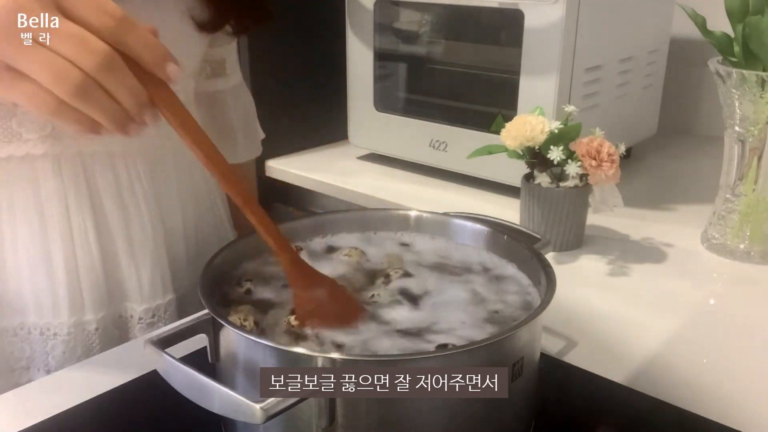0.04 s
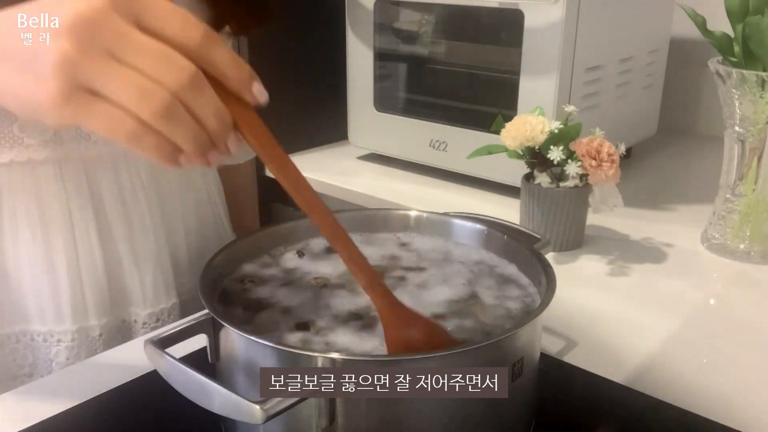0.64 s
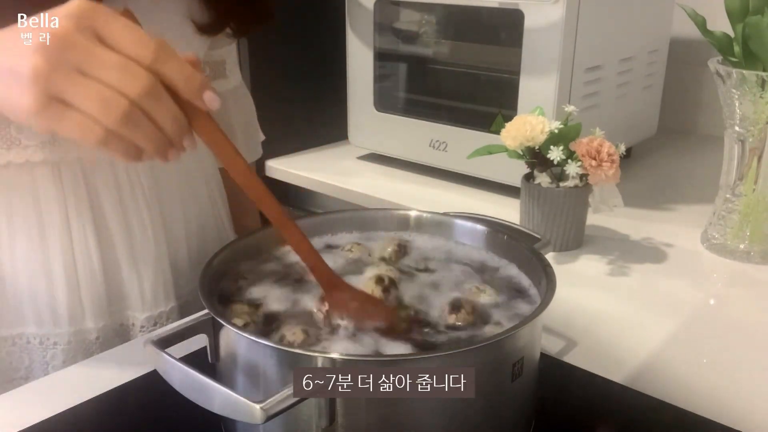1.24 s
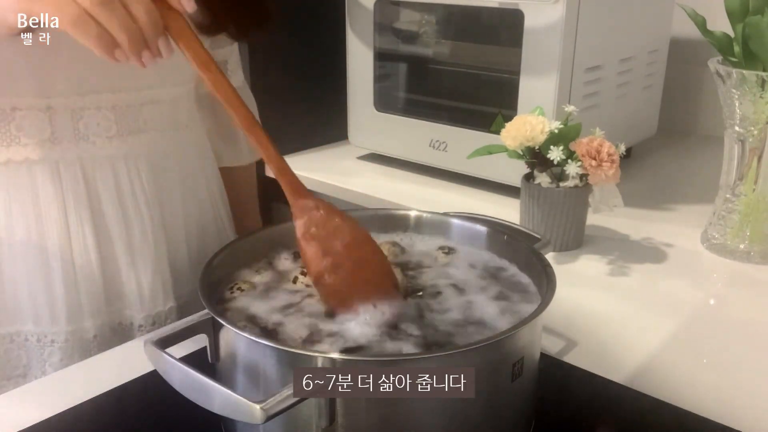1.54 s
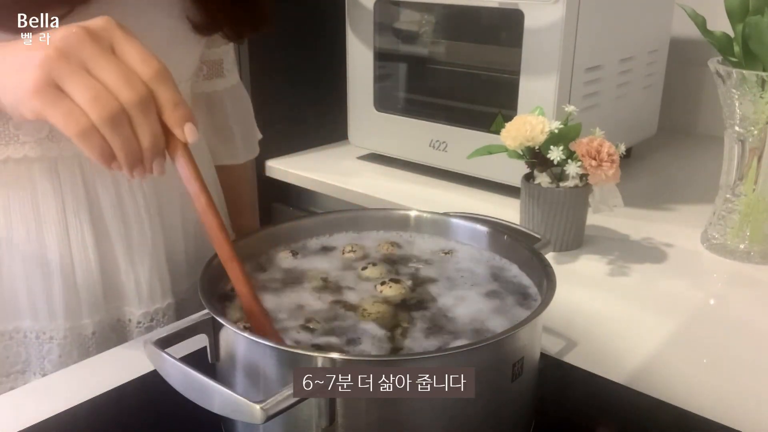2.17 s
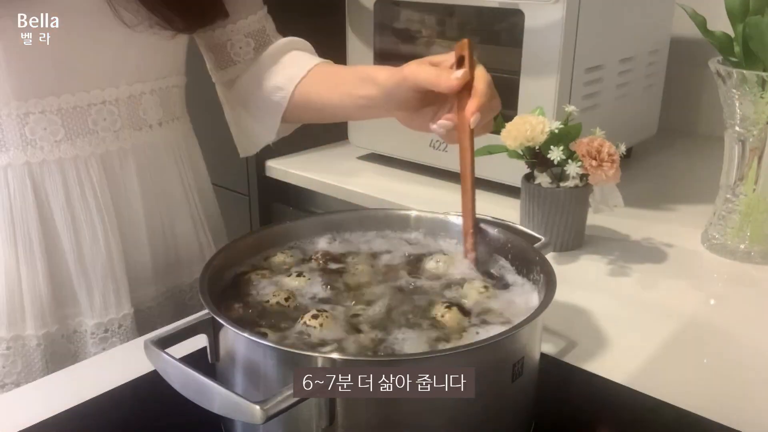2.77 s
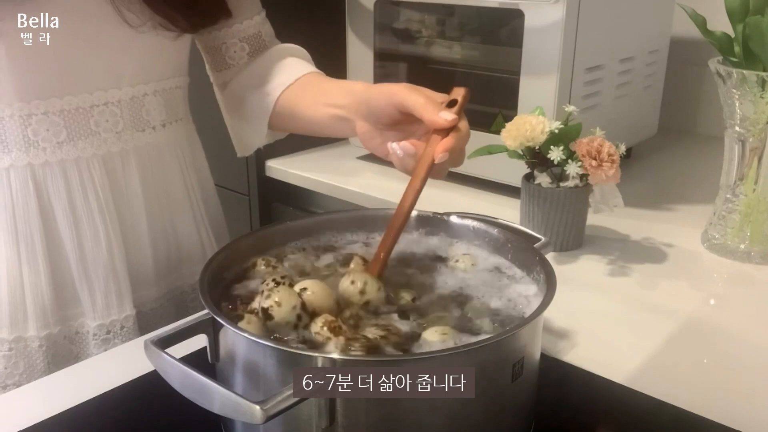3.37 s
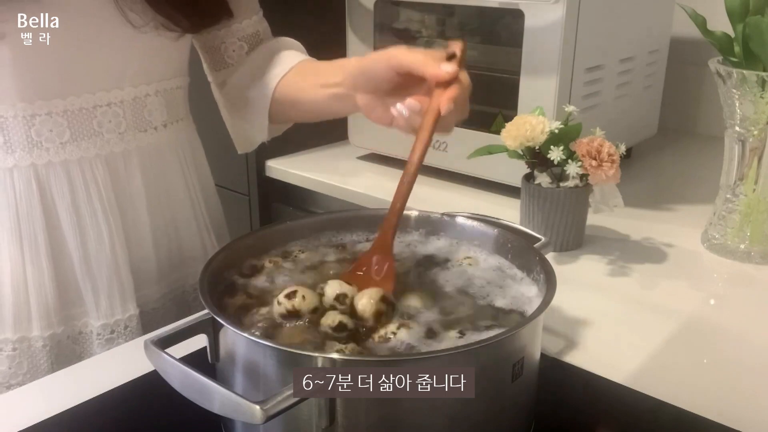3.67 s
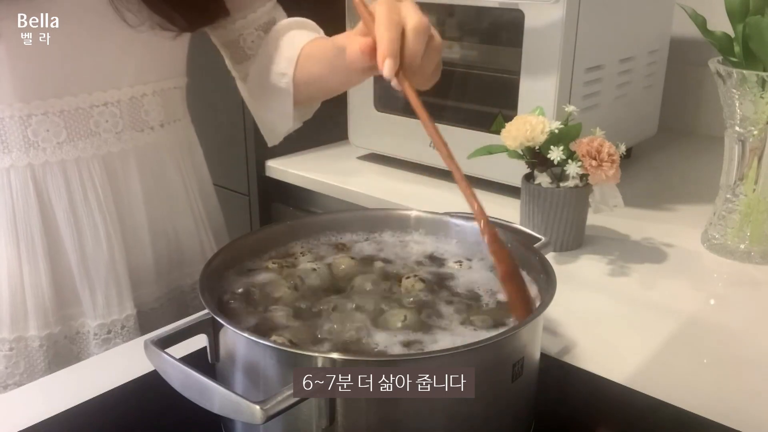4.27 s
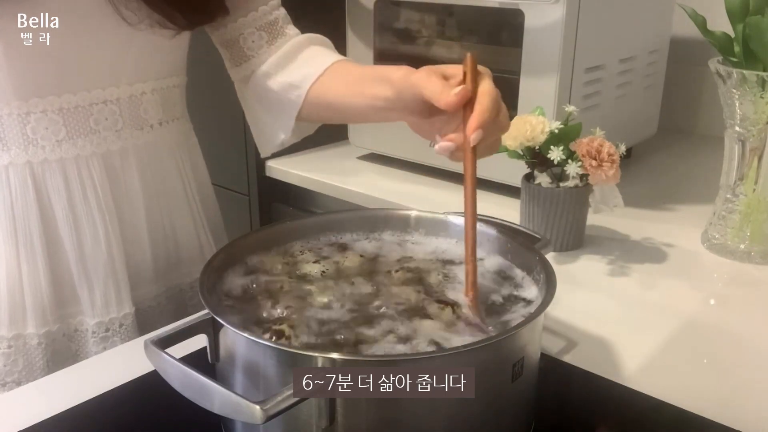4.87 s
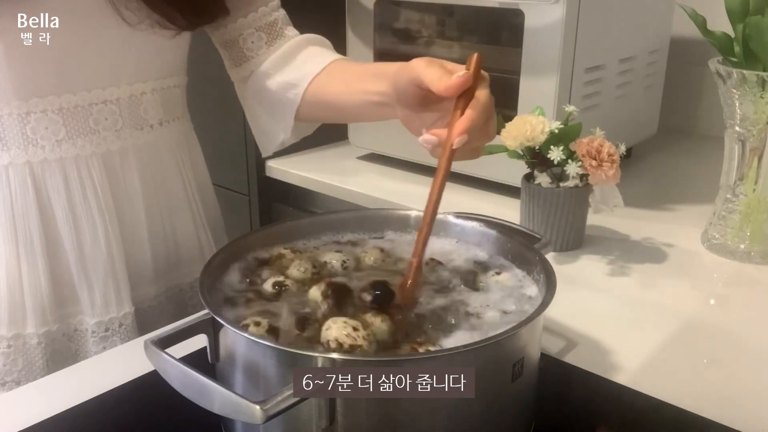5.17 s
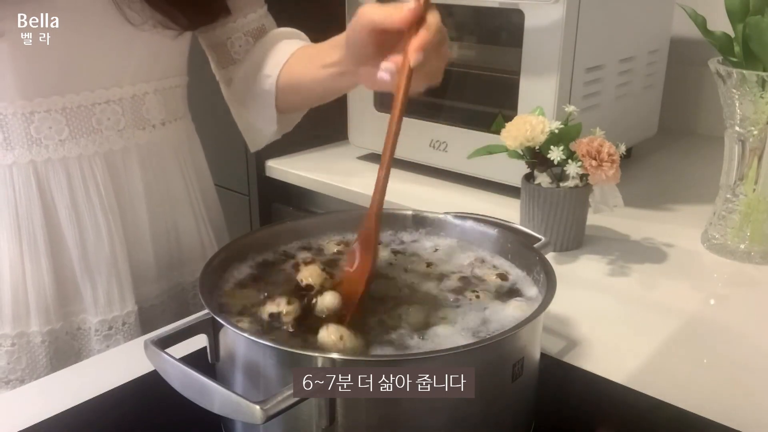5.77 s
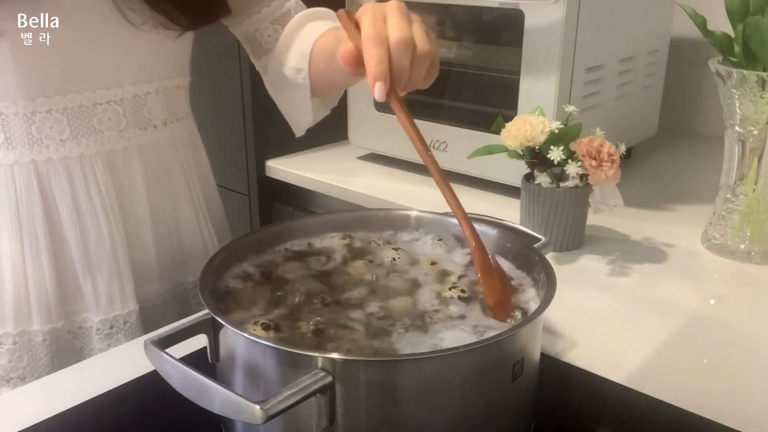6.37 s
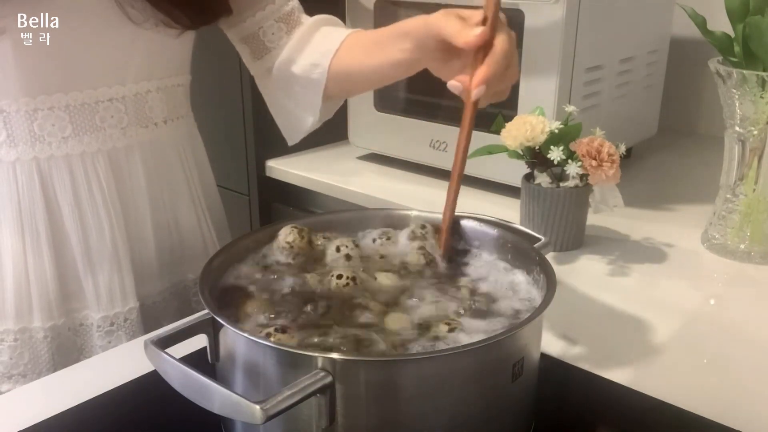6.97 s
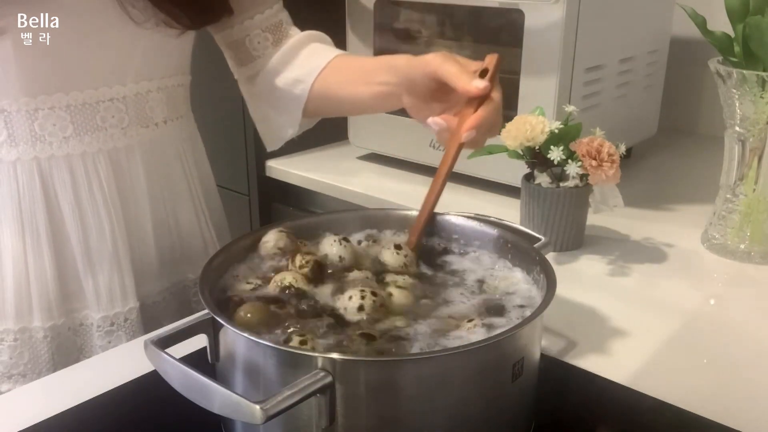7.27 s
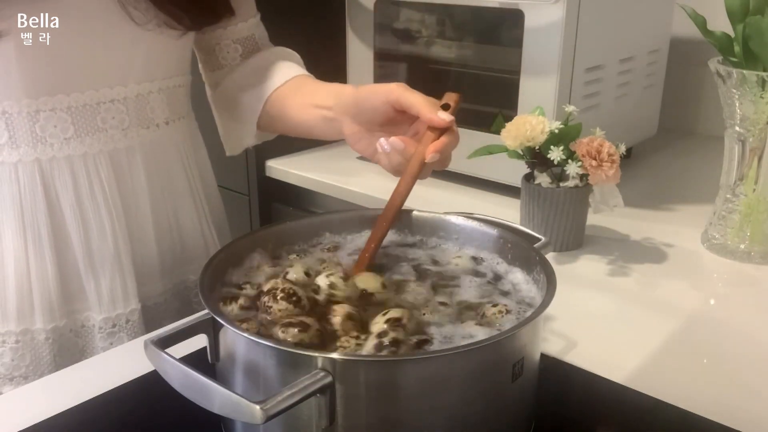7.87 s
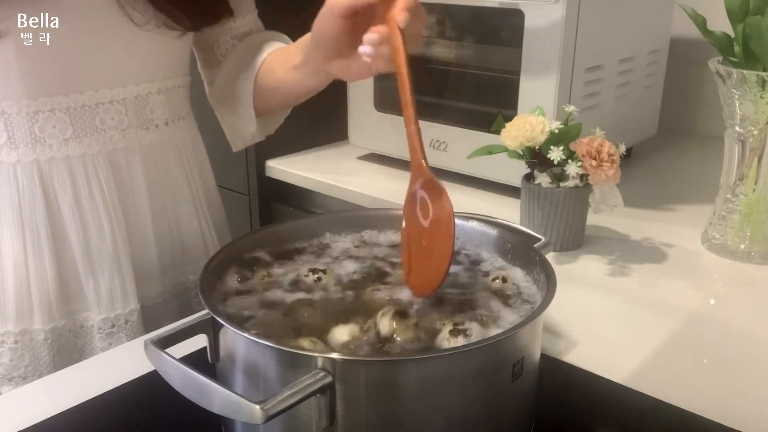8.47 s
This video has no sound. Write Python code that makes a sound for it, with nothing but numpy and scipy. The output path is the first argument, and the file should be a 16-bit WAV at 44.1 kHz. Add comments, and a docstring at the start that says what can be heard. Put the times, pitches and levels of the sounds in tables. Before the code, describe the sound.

Boiling water rumbles and gurgles in a steel pot while stirred quail eggs tick together and a wooden spoon knocks the sides.

```python
"""A small kitchen, one microphone close to an open steel pot of quail eggs boiling on the cooktop.
From the start vapour bubbles rumble the pot, and a wooden spoon stirs up gurgle, splash and fizz.
The spoon knocks on the steel, large bubbles plop, and the eggs clack and tick against each other.
At 2.75 s there is an edit click; after the cut the boil is louder and the stirring goes on.
From 3.5 s tiny bubbles spit now and then as eggs are lifted through the surface."""
import sys
import numpy as np
from scipy import signal
from scipy.fft import rfft, irfft
from scipy.io import wavfile
from scipy.ndimage import uniform_filter1d

SR = 44100
rng = np.random.default_rng(int(sys.argv[2]) if len(sys.argv) > 2 else 0)


def materialize(psi):
    """Save the field psi as 16-bit PCM at rate SR to the path in sys.argv[1].

    A 1-D psi becomes a single channel; in a 2-D psi each row is a channel.
    """
    bounded = np.clip(np.atleast_2d(psi).T, -1, 1)
    quanta = np.round(bounded * 32767).astype(np.int16)
    wavfile.write(sys.argv[1], SR, quanta)


N = 376613
CUT_S = 2.7533   # an edit: gentle boil before it, rolling boil after


def from_db(db):
    """Decibels to gain."""
    return 10 ** (np.asarray(db) / 20)


def rms_one(x):
    """Scale to rms 1."""
    return x / np.sqrt(np.mean(x ** 2) + 1e-20)


def even(x, size=4000):
    """Hold the level near rms 1 over a window of `size` samples, keeping the grain."""
    x = rms_one(x)
    return x / np.sqrt(uniform_filter1d(x ** 2, size=size) + 1e-6)


def add(out, s, sound):
    """Mix a short sound in at time s."""
    at = int(np.clip(round(s * SR), 0, N - 1))
    out[at:at + len(sound)] += sound[:N - at]


def through(x, response):
    """Pass a sound through an impulse response."""
    return signal.oaconvolve(x, response)[:len(x)]


def butter(x, order, hz, kind):
    """Butterworth filter."""
    return signal.sosfilt(signal.butter(order, hz, kind, fs=SR, output="sos"), x)


def snap(spectrum, size=2048):
    """The most compact causal click (minimum phase) with these (frequency [Hz], level [dB]) points."""
    hz, db = np.transpose(spectrum)
    grid = np.maximum(np.fft.rfftfreq(size, 1 / SR), 1)
    magnitude = from_db(np.interp(np.log(grid), np.log(hz), db))
    cepstrum = irfft(np.log(magnitude))
    causal = 1 + np.sign(size / 2 - np.arange(size))
    causal[0] = 1
    return irfft(np.exp(rfft(cepstrum * causal)))


def resonate(x, hz, width):
    """One resonance with gain 1 at its peak."""
    r = np.exp(-np.pi * width / SR)
    feedback = [1, -2 * r * np.cos(2 * np.pi * hz / SR), r * r]
    return signal.lfilter(np.array([1, 0, -1]) * (1 - r * r) / 2, feedback, x + 1e-18)


def body(x, modes, sign=1):
    """Resonances side by side; sign=-1 alternates their polarity."""
    return sum(sign ** k * from_db(db) * resonate(x, hz, width)
               for k, (hz, width, db) in enumerate(modes))


def ring(hz, t60, size=2048):
    """A struck mode: a dying sine."""
    t = np.arange(size) / SR
    return np.sin(2 * np.pi * hz * t) * from_db(-60 * t / t60)


def drift(per_s):
    """A slow random wander with rms 1."""
    knots = rng.standard_normal(N // 40)
    return rms_one(np.interp(np.arange(N) / SR * per_s, np.arange(len(knots)), knots))


def collapses(per_s, spread_db):
    """Clicks at random moments: many small, a few large."""
    sizes = from_db(spread_db * np.minimum(rng.exponential(1, N), 4.5)) * rng.choice([-1, 1], N)
    return sizes * (rng.random(N) < per_s / SR)


def bubble(hz, cycles, rise, size=2048):
    """A bubble rings for some cycles and climbs in pitch as it nears the surface."""
    turns = hz * np.arange(size) / SR
    age = turns / cycles
    return np.sin(2 * np.pi * turns * (1 + rise * np.minimum(age, 1))) * from_db(-60 * age)


def bubble_cloud(clicks, low_hz, high_hz, cycles, rise, count=28):
    """Each click starts a bubble of a chance size; the spectrum is even across the range."""
    dealt = rng.integers(0, count, N)
    return sum(hz * through(clicks * (dealt == k), bubble(hz, cycles, rise))
               for k, hz in enumerate(np.geomspace(low_hz, high_hz, count)))


def chatter(t60, loose_db, size=2048):
    """One contact, then a quickly dying rattle of the touching surfaces; energy 1."""
    rattle = rng.standard_normal(size) * from_db(-60 * np.arange(size) / SR / t60)
    contact = signal.unit_impulse(size) + from_db(loose_db) * rattle / np.linalg.norm(rattle)
    return contact / np.linalg.norm(contact)


def knock_colour(pitch_hz, softness, bass_db_per_octave=1.5, top_hz=8050, top_db_per_octave=17.5):
    """A knock is strongest at its pitch; the softer the touch, the faster it falls off above."""
    hz = np.geomspace(60, 16000, 60)
    octaves = np.log2(hz / pitch_hz)
    db = bass_db_per_octave * np.minimum(octaves, 0) - softness * np.maximum(octaves, 0)
    top_loss_db = top_db_per_octave * np.maximum(np.log2(hz / top_hz), 0)
    return np.column_stack([hz, db - top_loss_db])


def boil(stirred, gentle_db, rolling_db):
    """Gain of a layer: a gentle boil before the cut, a rolling one after; stirring adds its power."""
    boil_db = np.where(np.arange(N) / SR < CUT_S, gentle_db, rolling_db)
    return np.hypot(from_db(boil_db), stirred)


# spoon strokes through the water: (start [s], end [s], gurgle [dB], splash [dB], fizz [dB], rumble [dB])
STROKES = [(-0.05, 0.18, -61.5, -71.5, -75, -41.5), (0.721, 1.142, -58, -69, -83, -40),
           (1.19, 1.398, -59, -65, -81, -39), (1.451, 1.75, -69, -81, -94, -59),
           (1.806, 2.102, -57.5, -74, -83, -35.5), (2.327, 2.56, -57.5, -66.5, -77.5, -44.5),
           (2.751, 3.333, -58, -69, -82, -33.5), (3.4, 3.82, -59, -71, -80, -37.5),
           (4.719, 4.907, -62.5, -94, -97, -30.5), (4.945, 5.18, -57, -66, -71, -29.5),
           (5.203, 5.32, -55, -66, -70, -32), (5.354, 5.503, -60, -70, -86, -42),
           (5.558, 5.911, -63, -73.5, -75, -55), (6.38, 6.751, -62, -72, -74.5, -29.5),
           (6.932, 7.398, -64, -71.5, -74.5, -36), (7.399, 7.8, -68, -72.5, -81, -53),
           (7.871, 8.22, -62, -72, -78, -35.5)]
def stirring(attack_s=0.069, settle_db_per_s=61):
    """Gains of gurgle, splash, fizz and rumble: the water picks up with each stroke, then settles."""
    t, power = np.arange(N) / SR, 0
    for start, end, *levels_db in STROKES:
        attack = np.clip((t - start) / attack_s, 0, 1)
        settle = from_db(-settle_db_per_s * np.maximum(t - end, 0))
        power = power + np.outer(from_db(levels_db), attack * settle) ** 2
    return np.sqrt(power)


# low swaying of the full pot on the cooktop: (frequency [Hz], width [Hz], level [dB])
DEEP_SWAY = [(42.3, 3.6, 2.5), (62, 6.7, -0.5), (80.6, 8.5, -2.5)]
UPPER_SWAY = [(109.2, 7.1, 3.5), (137.8, 19.4, -6.5), (160.6, 19.3, -9.5)]
def rumble(stirred, heave_db=2.0):
    """The pot shakes with the boil, heaving unevenly, and more when the spoon moves the water."""
    deep = boil(stirred * from_db(-2.5), gentle_db=-46, rolling_db=-35.5)
    deep *= from_db(heave_db * drift(per_s=14))
    upper = boil(stirred * from_db(-9.5), gentle_db=-51.5, rolling_db=-43.5)
    upper *= from_db(heave_db * drift(per_s=11))
    return deep * shake(DEEP_SWAY, band_hz=[34.8, 93.8]) + upper * shake(UPPER_SWAY, band_hz=[92, 164])


def shake(modes, band_hz, per_s=260):
    """Vapour pockets collapse on the bottom and keep these modes of the pot moving."""
    motion = body(collapses(per_s, spread_db=1.5), modes, sign=-1)
    return even(butter(motion, 4, band_hz, "band"))


# modes of the steel walls: (frequency [Hz], width [Hz], level [dB])
WALL_MODES = [(207.2, 14.2, 4.5), (250.7, 12.6, -4), (315.3, 18.5, -1.5), (394.3, 22.6, 2),
              (480.7, 15, -5.5), (552, 60, -10.5), (1070, 125, -14.5), (1095, 62, -16.5), (1200, 120, -20)]
def simmer(stirred):
    """Countless small vapour bubbles collapse on the hot steel and keep the walls humming."""
    hum = shake(WALL_MODES, band_hz=[180, 1400], per_s=3000)
    swirl = stirred * boil(0, gentle_db=0.5, rolling_db=3.5)
    return boil(swirl, gentle_db=-83, rolling_db=-57) * hum


# colours of the bubbling water, close up: (frequency [Hz], level [dB])
GURGLE_COLOUR = [(120, -4), (200, 4), (300, -1), (400, -3.5), (470, -4.5), (650, -1.5), (900, 0),
                 (1200, -6.5), (1450, -6.5), (2200, -22)]
SPLASH_COLOUR = [(600, -8), (1300, -8.5), (2000, 1), (3200, -2.5), (3900, -9), (6000, -4.5)]
FIZZ_COLOUR = [(2000, 2), (3800, -0.5), (5600, -4), (7800, -1.5), (9500, -10), (12000, -11), (16000, -25)]
def water(gurgling, splashing, fizzing):
    """Middling bubbles gurgle, small ones splash in clumps, foam cells pop and tiny bubbles ping."""
    clumps = drift(per_s=55)
    middling = bubble_cloud(collapses(420 * from_db(6 * clumps), 3.5), 241, 1624, cycles=6.9, rise=0.074)
    small = bubble_cloud(collapses(380 * from_db(6 * clumps), 3.4), 1060, 4300, cycles=3.6, rise=0.05)
    foam = bubble_cloud(collapses(900 * from_db(6.5 * clumps), 1.5), 3100, 12000, cycles=3.8, rise=0.03)
    tiny = bubble_cloud(collapses(170, spread_db=2.2), 5200, 7600, cycles=45, rise=0.01)
    gurgle_gain = boil(gurgling * from_db(1.5), gentle_db=-69.5, rolling_db=-62)
    splash_gain = boil(splashing * from_db(-1.5), gentle_db=-92, rolling_db=-75.5)
    foam_gain = boil(fizzing * from_db(-6), gentle_db=-98, rolling_db=-74.5)
    gurgle = gurgle_gain * even(through(middling, snap(GURGLE_COLOUR)), size=6000)
    splash = splash_gain * even(through(small, snap(SPLASH_COLOUR)), size=6000)
    fizz = foam_gain * even(through(foam, snap(FIZZ_COLOUR)), size=6000)
    pings = foam_gain * from_db(-7) * rms_one(tiny)
    return gurgle + splash + fizz + pings


def glugs(gurgling):
    """Bubbles of nearly one size keep breaking the surface, only faintly before the cut."""
    cloud = bubble_cloud(collapses(per_s=60, spread_db=1.5), 1077, 1253, cycles=30, rise=0.045, count=10)
    swirl = gurgling * boil(0, gentle_db=-14, rolling_db=-7)
    return boil(swirl, gentle_db=-95, rolling_db=-74.5) * even(cloud, size=12000)


# colour of grazing shells and tearing foam: (frequency [Hz], level [dB])
CRACKLE_COLOUR = [(500, -14), (1500, 3), (3000, 2), (5500, -0.5), (8000, -2.5), (11000, -11), (16000, -28)]
def crackle(fizzing, gain_db=-2.5):
    """Shells graze and foam tears in the spoon's wake: fine, dry, unpitched ticks in clumps."""
    grains = collapses(170 * from_db(5 * drift(per_s=45)), spread_db=4)
    return from_db(gain_db) * fizzing * even(through(grains, snap(CRACKLE_COLOUR)), size=9000)


# colour of the background at the microphone: (frequency [Hz], level [dB])
HISS_COLOUR = [(100, 11), (400, -5.5), (1100, -13), (2000, -17.5), (3100, -14), (3900, -20.5),
               (5500, -19.5), (7800, -21), (10000, -26), (15500, -31)]
def hiss(level_db=-62):
    """A faint, steady noise lies behind the pot."""
    return from_db(level_db) * rms_one(through(rng.standard_normal(N), snap(HISS_COLOUR)))


# how an egg rings: (frequency [multiple of its pitch], level [dB], t60 [s])
EGG_MODES = [(0.57, -0.5, 0.007), (1.0, -1.5, 0.0093), (1.52, -10, 0.005)]
def clack(hz, crack_db=18, softness=12):
    """Two eggs meet with a dry crack and ring for a few cycles."""
    crack = through(chatter(t60=0.012, loose_db=4), snap(knock_colour(hz, softness)))
    ringing = sum(from_db(db) * ring(hz * ratio, t60) for ratio, db, t60 in EGG_MODES)
    return from_db(crack_db) * crack + ringing


def jostle(splashing, per_s=18, gain_db=13.25, spread_db=4.5, low_hz=1200, high_hz=2490):
    """Eggs bump softly against each other at random, as hard as the spoon drives them."""
    out = np.zeros(N)
    for when, pitch, force in rng.random((int(per_s * N / SR), 3)):
        bump = clack(low_hz * (high_hz / low_hz) ** pitch)
        gain = splashing[int(when * N)] * from_db(gain_db + spread_db * (2 * force - 1))
        add(out, when * N / SR, gain * bump)
    return out


# the wooden spoon's own resonances: (frequency [Hz], width [Hz], level [dB])
SPOON_MODES = [(1000, 117, -6), (2480, 240, -13)]
# spoon and eggs knock on the pot, hard blows touching at several spots:
# (time [s], level [dB], hollow pitch [Hz], softness [dB lost per octave above the pitch])
KNOCKS = [(0.034, -20.5, 1790, 15), (0.0648, -9, 1035, 13), (0.152, -15.5, 1900, 12),
          (0.2338, -15, 1610, 10), (0.5408, -5.5, 1050, 4), (0.5478, -10, 1600, 15), (0.668, -12, 1000, 9),
          (0.6967, -13, 1200, 16), (0.7327, -8, 750, 9.5), (0.8321, -6.5, 1600, 11.5),
          (0.8365, -3, 1050, 25), (1.1438, -12, 1200, 12), (1.8102, -7.5, 1190, 11),
          (1.9035, -12.5, 1400, 12), (1.921, -16, 1024, 8), (2.006, -11, 1000, 8.5), (2.0566, 1, 760, 7.5),
          (2.0567, -8, 4200, 26), (2.0619, 1.5, 520, 11), (2.064, -10, 2600, 29), (2.161, -18, 830, 8),
          (2.3148, -9.5, 900, 13), (2.3425, -8.5, 800, 12), (2.649, -16.5, 1810, 8.5),
          (3.4355, -10.5, 1210, 14), (3.4796, -9.5, 950, 6.5), (3.5645, -10.5, 1090, 12.5),
          (4.168, -14, 3000, 8), (5.2855, -11, 1000, 12), (5.3174, -6, 895, 18), (5.622, -13.5, 1460, 12),
          (5.8183, -10, 850, 17), (6.1012, -10, 1540, 7.5), (6.1747, 0, 2370, 5.5), (6.1832, -11, 5830, 9),
          (6.2722, -7.5, 817, 6), (6.315, -8, 1256, 13.5), (6.5435, 0, 1110, 16), (7.7367, -13, 1000, 17),
          (7.9465, -9, 1400, 14), (8.2521, -6, 746, 14.5), (8.2777, -7, 500, 8.5),
          (8.4505, -2.5, 720, 14.5), (8.4655, -5, 600, 15)]
def knocks(gain_db=-1.88, rebound_s=0.0056, rebound_db=-12, hollow_db=-1, hollow_width_hz=240):
    """Wood and shell on steel: hard touches are bright, soft ones dull and smeared; each rebounds once."""
    out = np.zeros(N)
    for s, db, pitch_hz, softness in KNOCKS:
        click = from_db(db + gain_db) * snap(knock_colour(pitch_hz, softness))
        knock = click + body(click, SPOON_MODES + [(pitch_hz, hollow_width_hz, hollow_db)])
        smear = chatter(t60=0.036, loose_db=-5 + 0.21 * softness)
        add(out, s, through(smear, knock))
        add(out, s + rebound_s * rng.uniform(0.616, 1.5), from_db(rebound_db) * knock)
    return out


# large bubbles burst at the surface: (time [s], level [dB], pitch [Hz])
PLOPS = [(0.127, -46, 410), (0.1915, -41, 1040), (0.835, -28.5, 800), (0.878, -40, 830),
         (1.076, -36.5, 1120), (1.2028, -47, 1120), (1.361, -33.5, 920), (1.8583, -42, 413),
         (1.868, -38, 290), (1.882, -43, 470), (1.9032, -45, 560), (1.93, -41, 1120), (2.007, -44, 900),
         (2.51, -37, 1090), (2.5346, -40, 840), (3.302, -33.5, 1100), (3.531, -40, 552), (3.565, -33, 1070),
         (4.1406, -39, 1055), (4.584, -37, 1010), (4.838, -36.5, 711), (5.041, -35.5, 1160),
         (5.119, -34.5, 1110), (5.253, -38, 980), (5.2853, -38, 430), (5.41, -42, 600), (5.495, -36, 1080),
         (6.549, -32.5, 915), (6.574, -37, 820), (7.032, -35.5, 1050), (7.8398, -36, 1030),
         (8.008, -36, 800), (8.0415, -36.5, 1030), (8.342, -39, 1060), (8.356, -36.5, 690)]
def plops(gurgling, gain_db=-1, strays_per_s=6, stray_db=-44.5, low_hz=600, high_hz=1300):
    """A large bubble opens and its cavity rings briefly; lesser strays come when the water is lively."""
    out, strays = np.zeros(N), []
    freed = np.cumsum(boil(gurgling, gentle_db=-80, rolling_db=-61))   # grows as bubbles are set free
    for when, pitch in rng.random((int(strays_per_s * N / SR), 2)):
        s = np.searchsorted(freed, when * freed[-1]) / SR
        strays.append((s, stray_db, low_hz * (high_hz / low_hz) ** pitch))
    for s, db, hz in PLOPS + strays:
        add(out, s, from_db(db + gain_db) * bubble(hz, cycles=10, rise=0.1))
    return out


# shoves of the pot on the cooktop: (time [s], level [dB], pitch [Hz])
THUMPS = [(0.54, -38, 122), (2.06, -25, 47.1), (6.18, -31, 54), (6.544, -28.5, 114.5)]
def thumps(t60=0.29):
    """The spoon shoves the full pot, which rocks briefly."""
    out = np.zeros(N)
    for s, db, hz in THUMPS:
        add(out, s, from_db(db) * ring(hz, t60, size=16000))
    return out


# egg strikes egg: (time [s], level [dB], pitch [Hz])
CLACKS = [(0.79, -50, 1810), (0.8153, -49, 2260), (0.867, -46, 1510), (1.0428, -46, 1900),
          (1.1513, -46.5, 1980), (1.2028, -46, 1820), (1.3096, -42, 1700), (1.8498, -39.5, 1770),
          (2.4, -56, 2400), (2.455, -54, 1900), (2.51, -56, 1820), (3.39, -45, 2600), (3.712, -44, 1610),
          (5.151, -52, 1960), (5.222, -53, 2550), (5.27, -45, 2200), (5.2857, -45, 1680),
          (5.3172, -38.5, 1800), (7.7804, -52.5, 3040), (7.9828, -45.5, 2800), (8.0416, -56, 2240)]
def clacks(gain_db=0.5):
    """The spoon drives eggs into each other; each pair has its own pitch."""
    out = np.zeros(N)
    for s, db, hz in CLACKS:
        add(out, s, from_db(db + gain_db) * clack(hz))
    return out


# colour of a shell tick: (frequency [Hz], level [dB])
SHELL_COLOUR = [(300, -7), (1700, 5), (3200, -0.5), (4500, -3.5), (7800, -9), (11000, -26), (16000, -14)]
# shells tick together: (time [s], level [dB], ring [Hz])
TICKS = [(0.9738, -25.5, 5050), (1.1445, -33, 5500), (1.24, -31, 2700), (1.311, -39, 3300),
         (1.353, -24, 7100), (1.38, -28, 3340), (1.402, -28, 5200), (1.599, -33, 4370), (1.9035, -32, 4050),
         (1.92, -28, 5300), (1.958, -27, 3450), (2.342, -21, 7700), (2.401, -31, 4200), (2.438, -30, 3450),
         (2.6013, -33, 3600), (3.365, -31, 3100), (3.3929, -29, 4700), (3.9482, -32, 5700),
         (4.3, -27, 3900), (4.965, -28.5, 5860), (5.061, -26, 5200), (5.126, -31, 7500), (5.151, -28, 5540),
         (5.212, -30, 5670), (5.2532, -28, 4330), (5.2855, -26.5, 5820), (5.4315, -24.5, 4840),
         (6.3835, -34, 3570), (6.667, -23.5, 8050), (7.279, -30.5, 5230), (7.412, -31, 8500),
         (7.857, -26.5, 7860), (8.1851, -32, 4170)]
def ticks(ring_db=-3, ring_width_hz=700):
    """Thin shells meet with a short, sharp crack and a brief high ring."""
    out = np.zeros(N)
    for s, db, hz in TICKS:
        contact = from_db(db) * chatter(t60=0.015, loose_db=5)
        crack = through(contact, snap(SHELL_COLOUR))
        add(out, s, crack + from_db(ring_db) * resonate(contact, hz, ring_width_hz))
    return out


def cut_click(click_db=-16, thud_db=-25):
    """An edit click with a low thud; after the cut the boil is louder."""
    out = np.zeros(N)
    click = snap([(100, 28), (500, 15), (2000, 2), (8000, -11), (16000, -15)])
    add(out, CUT_S, from_db(click_db) * click)
    add(out, CUT_S, from_db(thud_db) * ring(hz=75, t60=0.039, size=4096))
    return out


# tiny bubbles spit as eggs break the surface: (time [s], level [dB], pitch [Hz])
SPITS = [(3.493, -56, 6200), (3.565, -54, 7000), (3.587, -58, 5400), (3.601, -61, 6200), (3.681, -57, 6070),
         (3.759, -61, 5770), (3.816, -59, 6130), (4.228, -61, 5415), (4.527, -59, 7500), (5.643, -59, 5750),
         (5.683, -62, 6100), (5.818, -56, 5950), (5.854, -61, 6130), (7.985, -63, 5620), (8.042, -65, 5850),
         (8.107, -64, 5520), (8.3422, -59, 7550), (8.407, -62, 7210), (8.4513, -56, 7880),
         (8.4653, -60, 7100)]
def spits(ping_db=6.5, film_db=18, film_width_hz=3500):
    """A film of water snaps on a lifted egg and the tiny bubble under it pings."""
    out = np.zeros(N)
    for s, db, hz in SPITS:
        film = from_db(film_db) * resonate(chatter(t60=0.018, loose_db=-1), hz, film_width_hz)
        ping = from_db(ping_db) * bubble(hz, cycles=55, rise=0.03)
        add(out, s, from_db(db) * (ping + film))
    return out


# resonances of the pot and the air above the water: (frequency [Hz], width [Hz], level [dB])
POT_MODES = [(320, 62, 1.5), (358, 52, 0), (490, 11.3, 1.5), (565, 15.6, 3.5), (720, 63, -7.5),
             (1083, 93, -10.5), (1083, 99, -7.5), (1810, 300, -6), (2240, 230, -9), (3110, 290, -6),
             (5490, 770, -6), (6200, 260, -25)]
def pot(inside):
    """Sounds made in the pot take on its resonances on their way to the microphone."""
    return inside + body(inside, POT_MODES)


def flatten(echoes, size=2048):
    """Even out the broad colour of a cluster of echoes, keeping its timing."""
    power = uniform_filter1d(np.abs(rfft(echoes[:size], size)) ** 2, size=7)
    hz = np.maximum(np.fft.rfftfreq(size, 1 / SR), 1)
    excess_db = 10 * np.log10(power / power.mean())
    return through(echoes, snap(np.column_stack([hz, -excess_db])))


def reflections(early_t60=0.081, late_t60=0.27, treble_t60=0.25, early_db=-1, late_db=-7, wall_hz=3300):
    """Direct sound, close echoes off pot wall and worktop, then a short room tail; treble dies first."""
    size = 20000
    t = np.arange(size) / SR
    decays = from_db(-60 * t / [[early_t60], [late_t60], [treble_t60]])
    early, late, treble = rng.standard_normal((3, size)) * decays * (t > 0.0015)   # echoes after 1.5 ms
    dull = butter(late, 3, wall_hz, "low")
    bright = from_db(-1.5) * butter(treble, 3, wall_hz, "high")
    close = flatten(signal.unit_impulse(size) + from_db(early_db) * early / np.linalg.norm(early))
    return close + from_db(late_db) * (dull + bright) / np.linalg.norm(late)


def kitchen(x, spots=6, gain_db=-3):
    """The sound wanders between spots in the pot, each with its own echo paths to the microphone."""
    shares = from_db(20 * np.array([drift(per_s=18) for _ in range(spots)]))
    shares = shares / shares.sum(axis=0)
    return from_db(gain_db) * sum(through(x * share, reflections()) for share in shares)


def scene():
    """Mono, beside the cooktop: bubbles and contacts sound through pot and kitchen, the rest is direct."""
    gurgling, splashing, fizzing, rumbling = stirring()
    bubbles = water(gurgling, splashing, fizzing) + glugs(gurgling) + plops(gurgling) + spits()
    contacts = knocks() + clacks() + jostle(splashing) + ticks() + crackle(fizzing)
    background = hiss()
    in_room = kitchen(pot(bubbles + contacts))
    direct = simmer(gurgling) + rumble(rumbling) + thumps()
    return (in_room + direct + background + cut_click())[None]


def record(dry, cutoff_hz=15750):
    """The microphone signal is cut steeply at the top."""
    return signal.sosfilt(signal.ellip(12, 0.1, 80, cutoff_hz, fs=SR, output="sos"), dry)


dry = scene()
out = record(dry)
materialize(out)
```